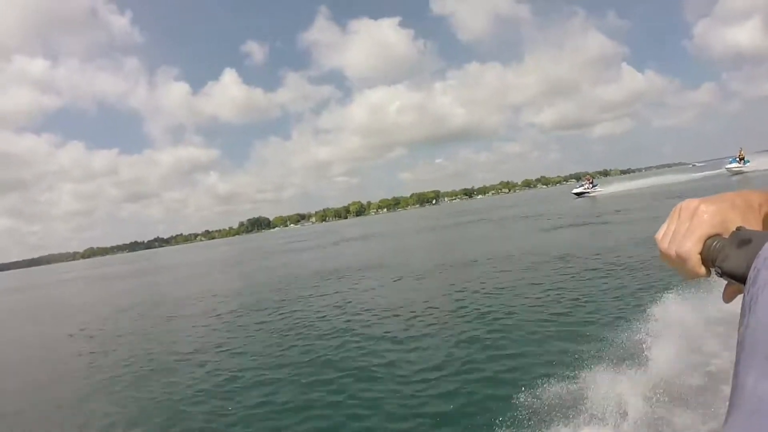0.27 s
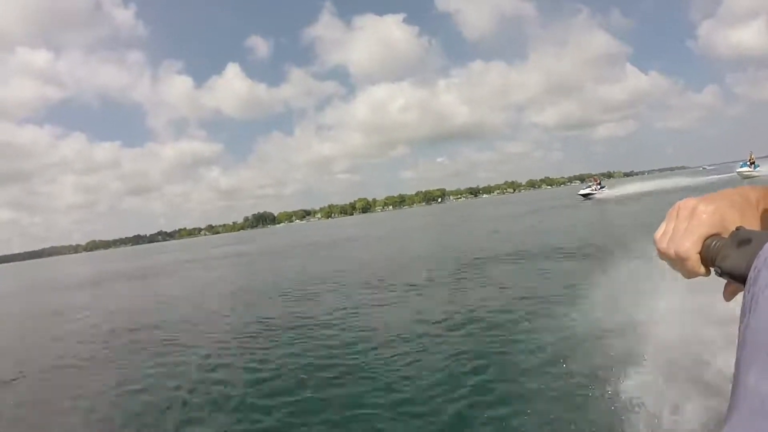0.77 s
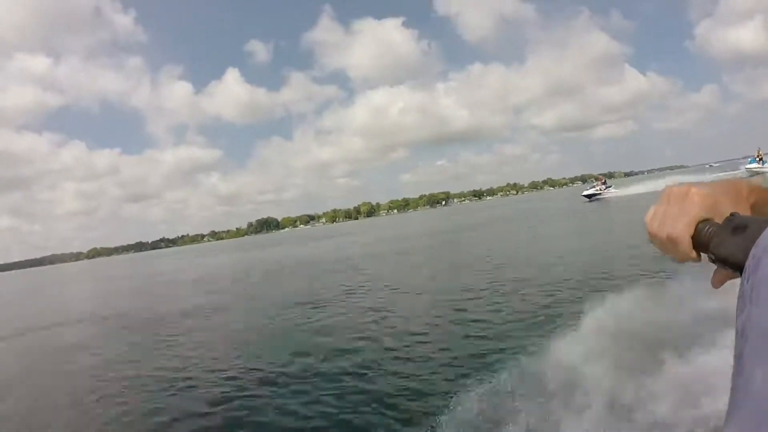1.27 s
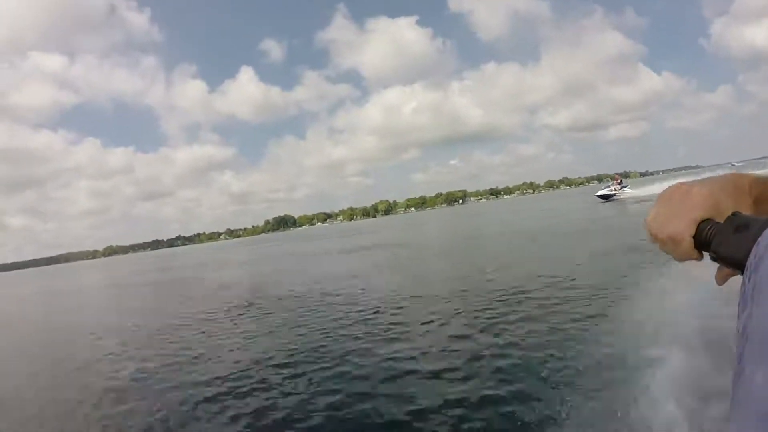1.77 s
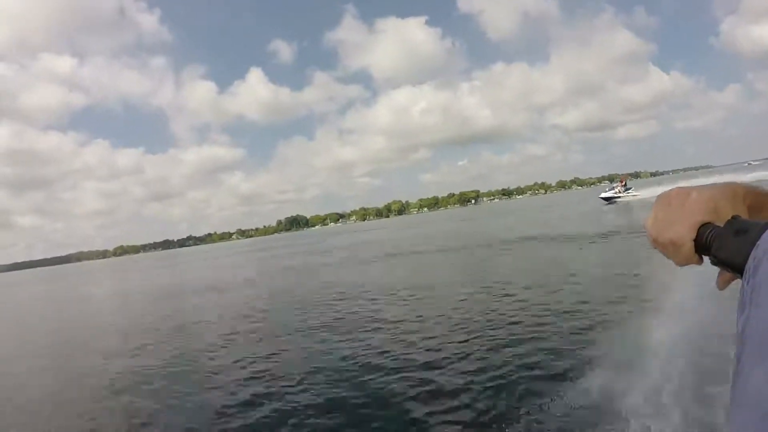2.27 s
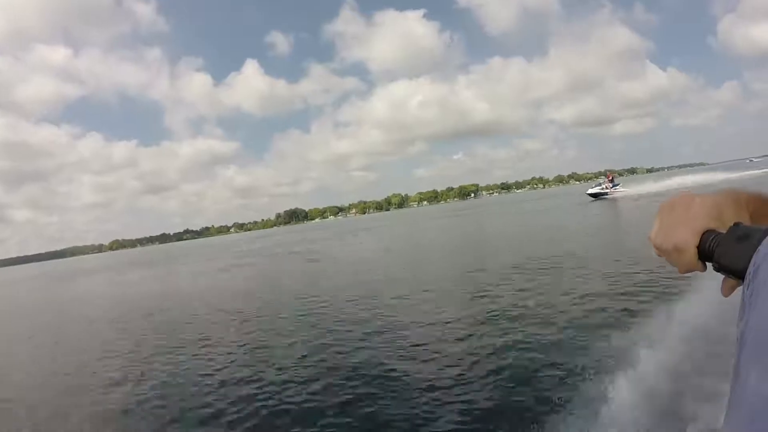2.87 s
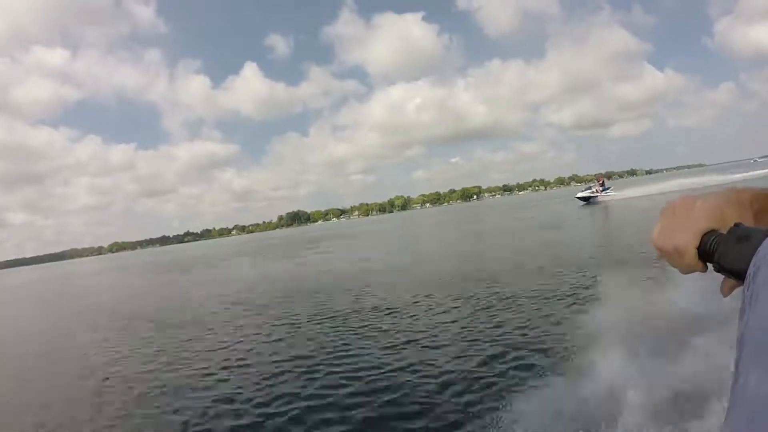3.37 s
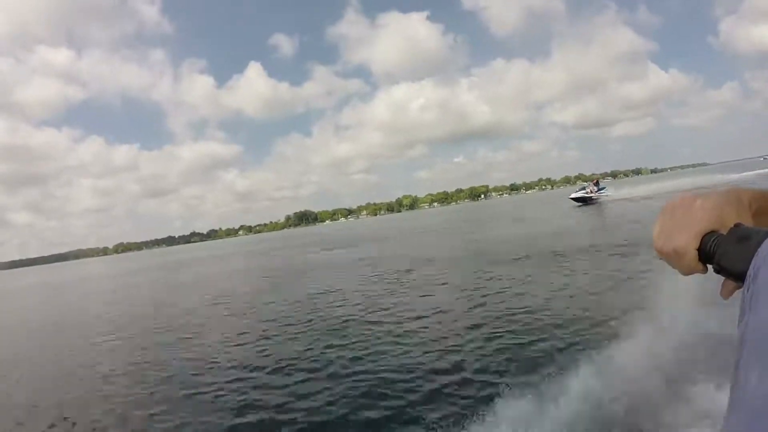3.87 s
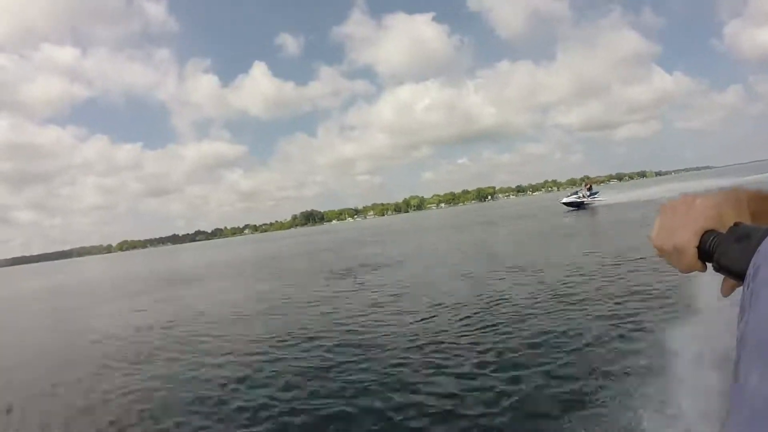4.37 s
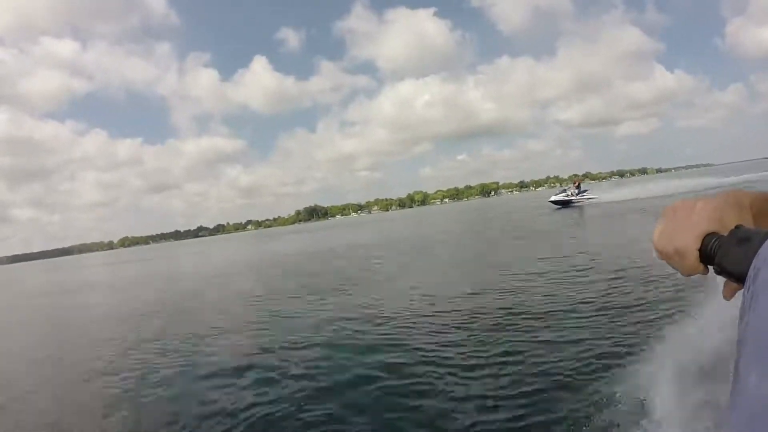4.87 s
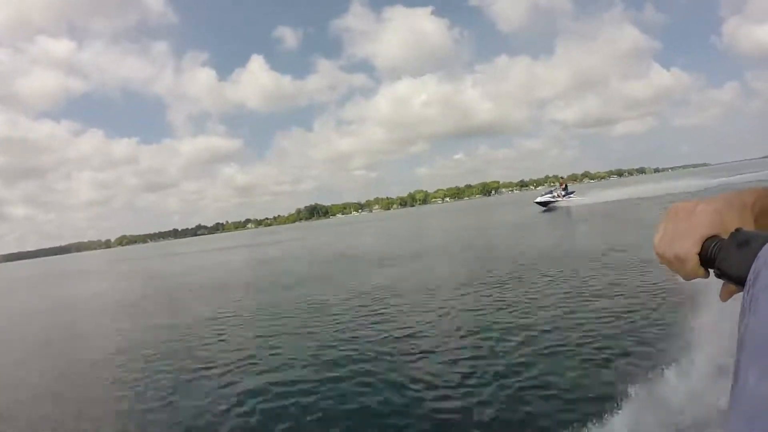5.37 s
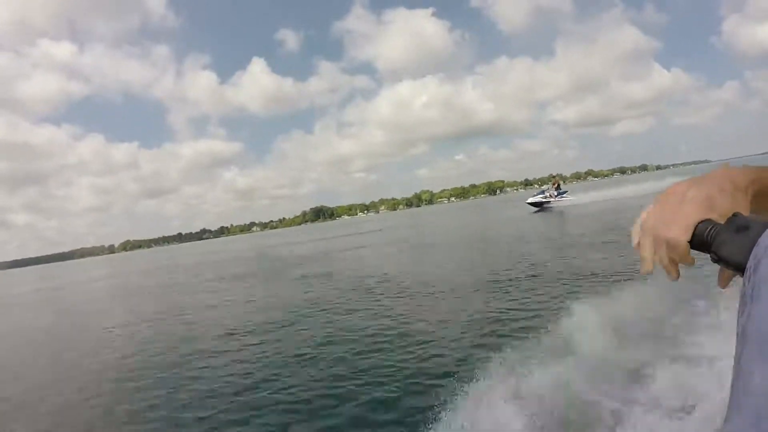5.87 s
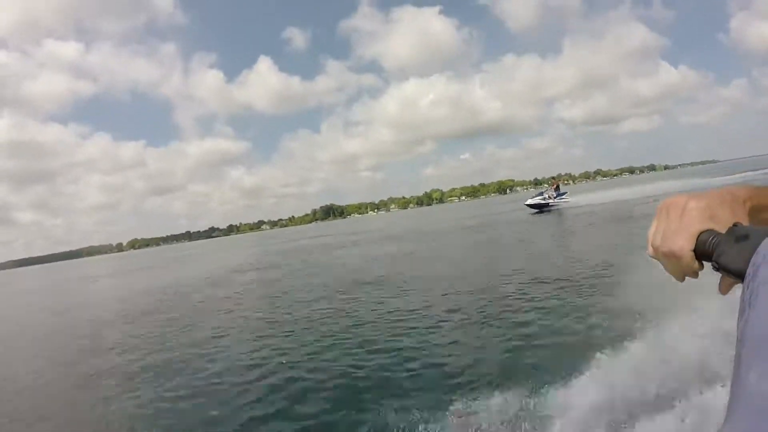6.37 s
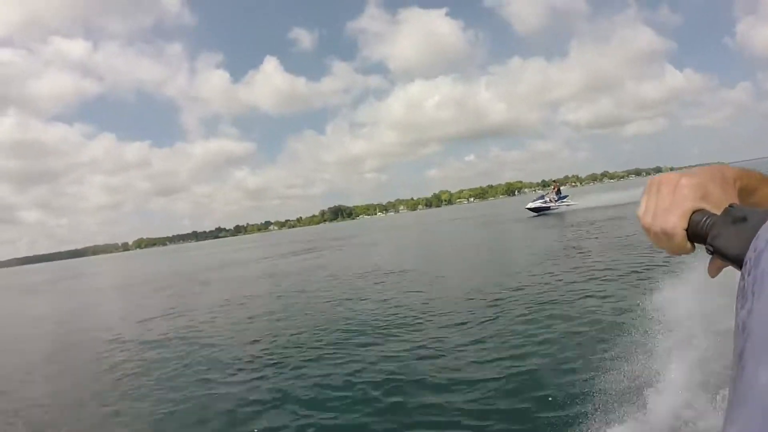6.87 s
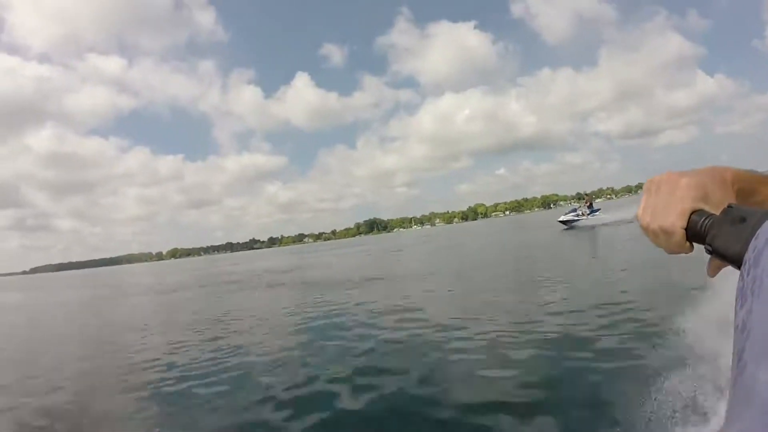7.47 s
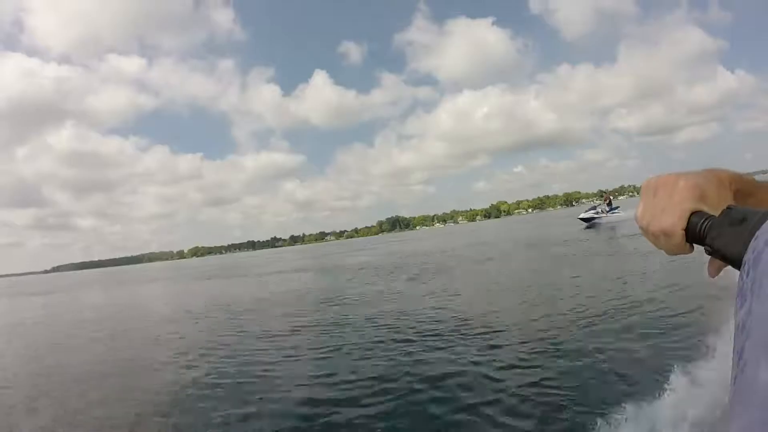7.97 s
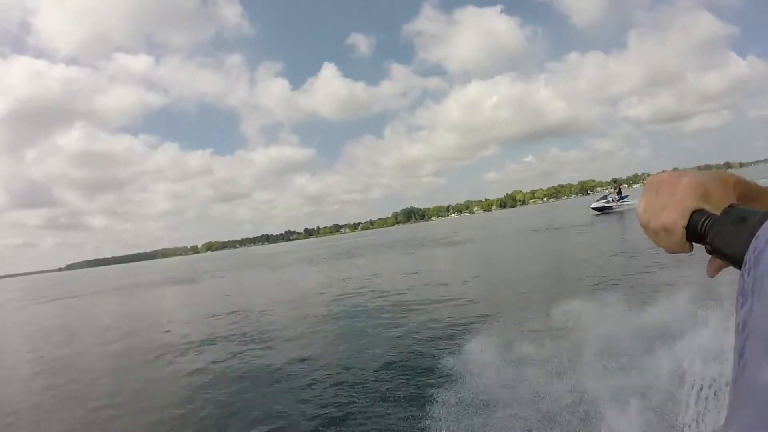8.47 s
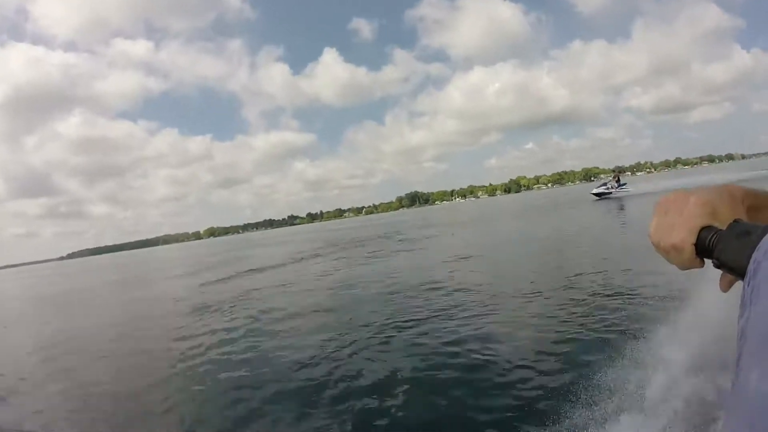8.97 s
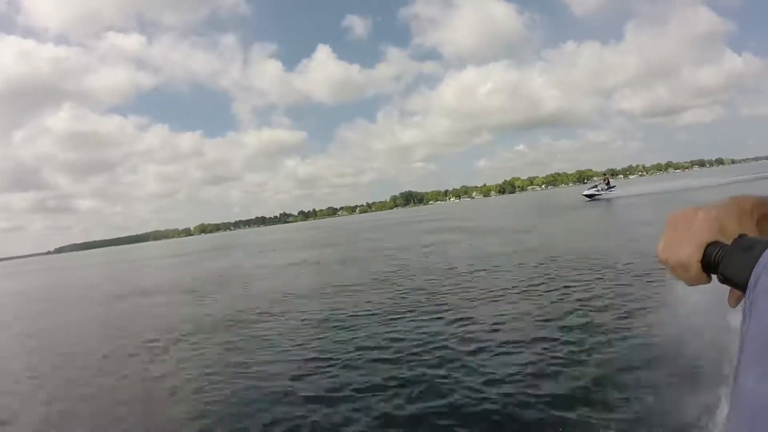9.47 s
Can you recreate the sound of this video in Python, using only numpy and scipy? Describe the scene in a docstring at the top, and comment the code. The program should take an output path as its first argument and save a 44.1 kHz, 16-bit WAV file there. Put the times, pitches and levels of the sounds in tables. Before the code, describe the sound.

A personal watercraft runs at high throttle throughout, heard from the rider's seat by a close microphone in a waterproof housing. From the first instant a low two-stroke drone, around 95 cycles per second with a strong octave, dominates, its strength dipping briefly as the outlet dunks. Uneven booms, buzz and mechanical rattle roughen it; rushing water and a narrow, boxy hiss of spray swell on every wave, two to four times a second. A thin pump whistle wavers faintly. Tiny wet slaps land near 0.9, 1.3, 1.6, 1.9, 3.6, 4.0 and 6.2 s. From 2 to 5 s the engine labours, barking harder, its pitch sagging slightly near 4.7. About 6 s it climbs; from 7 to 8.5 s spray and bark recede and the hum is higher, clearer and fuller. Near 9 s a cluster of slaps and a short pitch dip bring some roughness back before it ends still running at about 9.7.

```python
"""Personal watercraft at high throttle

On a river, from the rider's seat, the microphone close by in a waterproof housing. The two-stroke drones in
crank orders; uneven firings boom in hull and pipe, and noise bursts rattle with each turn. Random drops make
rush and spray, swelling on every wave; short splashes with rising tones slap the hull.
Near 7 s the hull rises higher: spray and bark fall away, the engine gains speed and its pipe comes into tune."""
import sys
import numpy as np
from scipy import signal
from scipy.fft import rfft, irfft
from scipy.io import wavfile

SR = 44100
rng = np.random.default_rng(int(sys.argv[2]) if len(sys.argv) > 2 else 0)


def generate_wav(sig):
    """Save sig (samples, or channels by samples) to the path in sys.argv[1] as 16-bit PCM at SR."""
    pcm = np.round(np.clip(np.atleast_2d(sig).T, -1, 1) * 32767).astype(np.int16)
    wavfile.write(sys.argv[1], SR, pcm)


N = 428652

# spectral shape of the water rush, only relative levels count: f/Hz, density/dB per Hz
RUSH_SPECTRUM = [(20, -6), (45, -6), (80, -6), (250, -4), (430, -1.5), (560, -4), (730, -5), (850, -3.5),
                 (1150, -3.5), (1450, -2.5), (1800, -4), (2050, -12), (2300, -11), (3000, -37.5)]
# spectral shape of the fine spray, only relative levels count: f/Hz, density/dB per Hz
SPRAY_SPECTRUM = [(1500, -27.5), (2000, -3.5), (2350, 0.5), (2900, 1), (3200, -4), (3900, -21.5),
                  (4800, -19.5), (6700, -24.5), (7300, -31), (8500, -39), (9400, -33.5), (10800, -39.5),
                  (11600, -46), (15000, -59.5)]


def from_db(db):
    """Decibels to amplitude gain."""
    return 10 ** (np.asarray(db) / 20)


def rms_one(x):
    """Scale to unit power."""
    return x / np.sqrt(np.mean(x ** 2) + 1e-20)


def in_time(rows):
    """Each column of a curve table, joined by straight lines, at every sample."""
    s, *columns = np.transpose(rows)
    return [np.interp(np.arange(N) / SR, s, column) for column in columns]


def drift(rate):
    """Smooth chance of spread 1 that changes about rate times a second."""
    hz = np.arange(N // 2 + 1) * SR / N
    lowpass = 1 / (1 + (hz / rate) ** 2)
    return rms_one(irfft(rfft(rng.standard_normal(N)) * lowpass, N))


def hump(s, length):
    """A smooth rise to 1 and fall, centred on time s, length seconds in all."""
    offset = (np.arange(N) / SR - s) / length
    return np.cos(np.pi * np.clip(offset, -.5, .5)) ** 2


def resonate(x, hz, width):
    """A two-pole resonance with gain 1 on top."""
    r = np.exp(-np.pi * width / SR)
    zeros = np.array([1, 0, -1]) * (1 - r * r) / 2
    poles = [1, -2 * r * np.cos(2 * np.pi * hz / SR), r * r]
    return signal.lfilter(zeros, poles, x)


def ring(x, modes):
    """Resonances in parallel, each applied twice for dark valleys; unit power."""
    total = 0
    for hz, width, db in modes:
        once = resonate(x, hz, width)
        total = total + from_db(db) * resonate(once, hz, width)
    return rms_one(total)


def housed(x, spectrum):
    """Give x a smooth spectrum and the housing's peaks and hollows; white noise keeps its power."""
    # resonances and hollows of the housing: f/Hz, width at half the dB/Hz, level/dB
    housing_modes = [(472, 47, -14), (580, 57, -10), (878, 68, 4), (950, 18, -7), (1038, 23, 3),
                     (1269, 52, -15), (1371, 45, -10), (1483, 88, 6), (1547, 99, 4.5), (1720, 16, 1),
                     (2147, 66, -7.5), (2270, 33, -6.5), (2516, 45, 3), (3300, 190, -6), (5200, 330, -2.5),
                     (5666, 170, 8.5), (6397, 680, 13), (12200, 500, 3.5)]
    hz = np.arange(N // 2 + 1) * SR / N
    points_hz, points_db = np.transpose(spectrum)
    db = np.interp(np.log(hz + 1), np.log(points_hz), points_db, right=-np.inf)
    for centre, width, peak_db in housing_modes:
        db = db + peak_db * 2 ** -((2 * (hz - centre) / width) ** 2)
    return irfft(rfft(x) * rms_one(from_db(db)), N)


def swell(chop):
    """Load on the hull: each wave lifts it in one hump, and small chop roughens it."""
    # waves under the hull: t of the crest/s, strength (about 0-1), length/s
    crests = [(0.157, 0.7, 0.48), (0.387, 0.5, 0.15), (0.538, 1, 0.24), (0.843, 0.87, 0.33),
              (1.175, 0.9, 0.45), (1.512, 0.7, 0.45), (1.763, 0.28, 0.54), (1.919, 0.99, 0.2),
              (2.206, 0.4, 0.55), (2.375, 0.9, 0.14), (2.727, 0.8, 0.5), (2.96, 1, 0.33),
              (3.19, 0.38, 0.41), (3.395, 0.5, 0.63), (3.548, 0.65, 0.16), (3.707, 0.75, 0.31),
              (4.001, 0.9, 0.078), (4.171, 0.8, 0.27), (4.433, 0.7, 0.48), (4.671, 0.4, 0.12),
              (4.856, 0.5, 0.38), (5.07, 0.5, 0.54), (5.364, 0.7, 0.56), (5.576, 0.7, 0.14),
              (5.769, 0.82, 0.31), (6.054, 0.4, 0.11), (6.209, 0.88, 0.36), (6.477, 0.36, 0.45),
              (6.663, 0.6, 0.33), (6.849, 0.54, 0.34), (7.169, 0.1, 0.19), (7.337, 0.3, 0.13),
              (7.583, 1, 0.19), (7.78, 0.6, 0.2), (8.073, 0.5, 0.9), (8.413, 0.94, 0.23),
              (8.744, 0.62, 0.45), (8.901, 0.49, 0.16), (9.101, 0.92, 0.33), (9.584, 0.61, 0.55)]
    waves = sum(strength * hump(s, length) for s, strength, length in crests)
    return np.maximum(waves + chop * drift(12), 0)


def follow(law_db, ride, wave):
    """Level in dB of a sound that changes with the ride and with each wave."""
    base_db, ride_db, wave_db = law_db
    return base_db + ride_db * ride + wave_db * wave


def partial(turns, order, flutter_db, sway, in_step=False):
    """One order of unit power, fluttering in strength and phase; in step, it peaks with each turn."""
    start = 0 if in_step else rng.random()
    phase = 2 * np.pi * (order * turns + start) + sway * drift(11)
    return rms_one(from_db(flutter_db * drift(18)) * np.cos(phase))


def tuned_pipe(speed, wave):
    """Level in dB of the second order: rising engine speed tunes the pipe; waves and dunked outlet choke it."""
    # exhaust outlet dips under water: t/s, deepest loss of the second order/dB
    dunks = [(.13, 5), (.5, 7), (1.21, 5.5), (1.46, 11), (1.93, 16), (2.38, 5), (2.68, 4), (2.82, 13),
             (3.69, 9), (4.46, 10), (4.82, 9), (5.8, 7), (6.2, 8), (6.63, 1.5), (7.58, 3.5), (8.0, 5),
             (8.41, 12), (8.7, 4.5), (9.02, 3), (9.53, 9)]
    dunk_s = 0.098
    second_db, cruise_hz = -15.5, 94.95
    tuning_db_per_hz, wave_damping_db = 0.82, 2.0
    choke_db = sum(loss_db * hump(s, dunk_s) for s, loss_db in dunks)
    return second_db + tuning_db_per_hz * (speed - cruise_hz) - wave_damping_db * wave - choke_db


def drone(turns, first_db, second_db, third_db):
    """The lowest orders: the clean body of the engine note, adding up to one sharp suction pulse a turn."""
    first = from_db(first_db) * partial(turns, order=1, flutter_db=1.3, sway=0.05, in_step=True)
    second = from_db(second_db) * partial(turns, order=2, flutter_db=1.28, sway=0.18, in_step=True)
    third = from_db(third_db) * partial(turns, order=3, flutter_db=2.0, sway=.16, in_step=True)
    return -(first + second + third)


def bark(turns, orders, level_db):
    """Higher exhaust orders; uneven firing blurs them more the higher they lie."""
    total = 0
    for order, db in orders:
        tone = partial(turns, order=round(order), flutter_db=2.5, sway=0.032 * order)
        total = total + from_db(db) * tone
    return from_db(level_db) * total


def boom(turns, boom_db, bark_db):
    """Each of four exhaust pulses a turn differs from the last; the difference rings hull and pipe."""
    # hull resonances: f/Hz, width of each of two passes/Hz, relative level before scaling/dB
    hull_modes = [(116.3, 31, 0.5), (146.6, 14, 3.5), (203, 36, -9), (277.7, 130, -15), (361, 25, -6)]
    # exhaust pipe resonances: f/Hz, width of each of two passes/Hz, relative level before scaling/dB
    pipe_modes = [(210.5, 26, -1.5), (367.6, 37, -8.5), (527, 8.3, -18)]
    firings = np.diff(np.floor(4 * turns), prepend=0)
    hull_pulses, pipe_pulses = firings * rng.standard_normal((2, N))
    hull_ring = from_db(boom_db) * ring(hull_pulses, hull_modes)
    return hull_ring + from_db(bark_db + 2.0) * ring(pipe_pulses, pipe_modes)


def whine(turns, level_db):
    """The fifteenth order stands out whenever the engine speed carries it across a hull panel's resonance."""
    panel_hz, panel_width_hz = 1451.5, 18
    tone = partial(turns, order=15, flutter_db=1.0, sway=.3)
    return resonate(from_db(level_db) * tone, panel_hz, panel_width_hz)


def shudder(shake_hz, width_hz, level_db):
    """The mount shakes slowly: noise through one very low resonance, at a steady level."""
    return from_db(level_db) * ring(rng.standard_normal(N), [(shake_hz, width_hz, 0)])


def warble(level_db, whistle_hz, wander):
    """A pump whistle that wanders around one pitch as the intake gulps water and air."""
    cycles = np.cumsum(whistle_hz * (1 + wander * drift(9))) / SR
    return from_db(level_db) * partial(cycles, order=1, flutter_db=2.5, sway=0.14)


def rattle(turns, sharpness):
    """A burst of mechanical noise on every turn of the crank."""
    bursts = np.exp(sharpness * np.cos(2 * np.pi * turns))
    return rms_one(rng.standard_normal(N) * bursts * from_db(1.9 * drift(66)))


def drops(per_s, spread_db):
    """Random impacts of either sign, many small and a few large; unit power."""
    sizes = from_db(spread_db * np.minimum(rng.exponential(1, N), 4))
    impacts = sizes * rng.choice([-1, 1], N)
    return rms_one(impacts * (rng.random(N) < per_s / SR))


def water(turns, rush_db, spray_db):
    """Churning water and a sheet of drops, mixed with the rattle that comes through the hull."""
    churn, scatter = from_db(1.1 * drift(44)), from_db(.6 * drift(35))
    clatter = rattle(turns, sharpness=1.0)
    rush = rms_one(drops(per_s=5000, spread_db=2.0) + from_db(-5.5) * clatter)
    spray = rms_one(drops(per_s=14000, spread_db=2.0) + from_db(-15.0) * clatter)
    housed_rush = housed(rush * churn * from_db(rush_db), RUSH_SPECTRUM)
    return housed_rush + housed(spray * scatter * from_db(spray_db), SPRAY_SPECTRUM)


def slaps(decay_s, level_db, pocket_hz, rise_hz_per_s, pocket_db):
    """The hull meets a wave: a short splash, and a trapped air pocket that rings upward in pitch."""
    # slaps of water on the hull: t/s, relative level/dB
    hits = [(0.8706, -9.5), (1.2768, -19.5), (1.5515, -14.5), (1.9011, -12), (1.9427, -15.5), (3.5753, -14),
            (4.0207, -17), (6.194, -11.5), (6.2134, -12), (6.788, -16.5), (7.5885, -17.5), (8.4446, -16.5),
            (9.0111, -16.5), (9.044, -19), (9.0988, -10.5), (9.1369, -13.5), (9.1882, -18.5)]
    age = np.arange(SR // 25) / SR
    shape = age / decay_s * np.exp(1 - age / decay_s)
    rise_hz = rise_hz_per_s * np.minimum(age, 2 * decay_s)  # the pitch climbs, then holds
    splash, pockets = np.zeros((2, N))
    for (s, db), (size, start) in zip(hits, rng.standard_normal((len(hits), 2))):
        first = round(s * SR)
        span = slice(first, first + len(age))
        pitch = pocket_hz * np.exp(.08 * size) + rise_hz
        tone = np.sin(2 * np.pi * np.cumsum(pitch) / SR + start)
        splash[span] += from_db(db + level_db) * shape * rng.standard_normal(len(age))
        pockets[span] += from_db(db + pocket_db) * shape * tone
    return housed(splash, RUSH_SPECTRUM) + from_db(-9.5) * housed(splash, SPRAY_SPECTRUM) + pockets


def scene():
    """Engine, hull and water, all close by; unequal cylinders feed the odd orders."""
    # engine speed: t/s, crank rate f/Hz before a slight random drift
    crank_curve = [(0, 93), (.6, 94.4), (.85, 94), (1.5, 94.7), (2.6, 94.3), (4.7, 92.6), (5.33, 93.8),
                   (5.8, 95.4), (6.03, 97), (6.36, 96), (6.85, 97.1), (7.45, 98.8), (7.59, 100),
                   (7.68, 100), (7.78, 98.3), (7.92, 100.4), (8.05, 99.8), (8.18, 100.8), (8.6, 100.3),
                   (8.93, 100), (9.05, 97.5), (9.24, 100.6), (9.66, 97)]
    # the ride: t/s, draught (0 skimming, 1 deep), labour of engine and jet (0 light, 1 heavy),
    # imbalance of the cylinders/dB
    ride_curve = [(0, 0.82, 0.52, 2.5), (1.2, 0.86, .52, 1.5), (1.55, 1.01, 0.64, 2), (2.3, 0.78, 0.8, -1),
                  (2.7, 0.97, 1, -1), (3.4, 0.96, 0.94, 0.5), (4.4, 0.93, 0.96, -0.5),
                  (5.35, 1.07, 0.83, 1), (5.9, 0.83, .68, 0.4), (6.7, 0.68, 0.46, -1),
                  (7.05, 0.2, 0.076, -1), (7.6, 0, 0.091, -1.4), (8.4, 0.14, 0.1, -0.5),
                  (9, 0.46, 0.36, 0.9), (9.72, 0.53, 0.16, 1)]
    # middle exhaust orders: multiple of the crank rate, level against the bark/dB
    bark_orders = [(4, -1), (5, -1.5)]
    # high exhaust orders: multiple of the crank rate, level against the buzz/dB
    buzz_orders = [(6, -4), (7, -5.5), (8, -8.5), (9, -12.5), (10, -20), (11, -14), (12, -11), (13, -16),
                   (14, -20.5), (16, -10), (17, -7.5), (18, -9), (20, -15), (27, -13)]
    # how each sound follows the ride: base level/dB, rise at full draught or labour/dB,
    # rise on a full wave/dB
    first_law = (-21, -1.1, 5.5)
    third_law = (-30.0, 0.55, 1.5)
    bark_law = (-46.0, 15, 6.5)
    buzz_law = (-45.5, 12, 4.5)
    boom_law = (-32.5, 8, 1.6)
    rush_law = (-35, 6, 5)
    spray_law = (-40.5, 5.6, 4.5)
    pump_law = (-42, 4, 3.5)
    whine_law = (-38.5, 2.5, 8)  # ahead of the panel's resonance

    speed, = in_time(crank_curve)
    draught, labour, imbalance_db = in_time(ride_curve)
    wave = swell(chop=.1)
    turns = np.cumsum(speed * (1 + .004 * drift(9))) / SR
    first_db = follow(first_law, draught, wave) + imbalance_db
    second_db = tuned_pipe(speed, wave)
    third_db = follow(third_law, draught, wave) + imbalance_db
    bark_db = follow(bark_law, labour, wave)
    exhaust = drone(turns, first_db, second_db, third_db)
    exhaust = exhaust + bark(turns, bark_orders, bark_db)
    exhaust = exhaust + bark(turns, buzz_orders, follow(buzz_law, draught, wave))
    hull = boom(turns, follow(boom_law, labour, wave), bark_db)
    hull = hull + whine(turns, follow(whine_law, draught, wave))
    hull = hull + shudder(shake_hz=16.5, width_hz=6.2, level_db=-38.5)
    pump = warble(follow(pump_law, draught, wave), whistle_hz=1545, wander=.017)
    wash = water(turns, follow(rush_law, draught, wave), follow(spray_law, labour, wave))
    knocks = slaps(decay_s=0.0019, level_db=-10.0, pocket_hz=1481.4, rise_hz_per_s=110000, pocket_db=-5.5)
    return (exhaust + hull + pump + wash + knocks)[None]


def record(dry):
    """The sound opens over 5 ms without a click, and a steep low-pass cuts the top."""
    cutoff_hz = 15700
    opening = np.minimum(np.arange(N) / (.005 * SR), 1)
    lowpass = signal.ellip(10, .1, 80, cutoff_hz, fs=SR, output="sos")
    return signal.sosfilt(lowpass, dry * opening)


dry = scene()
out = record(dry)
generate_wav(out)
```